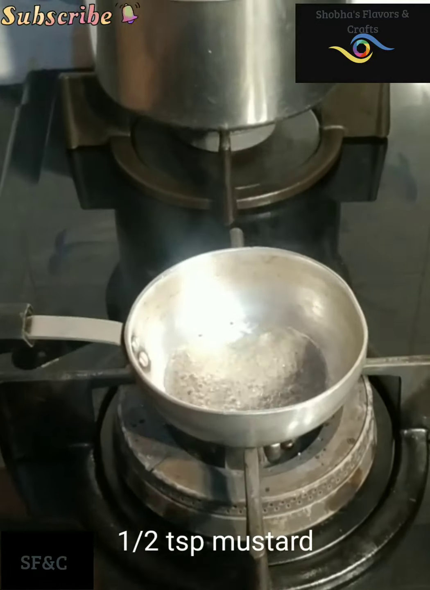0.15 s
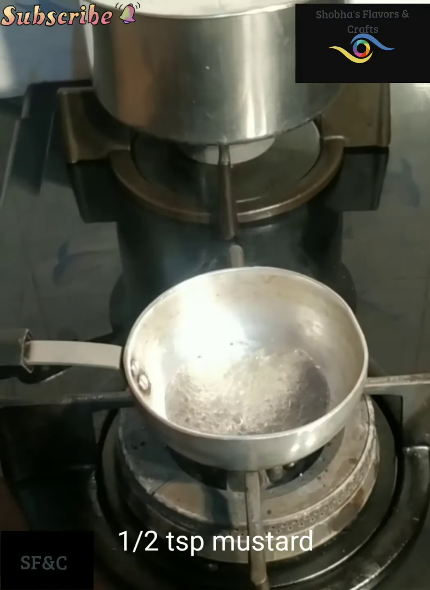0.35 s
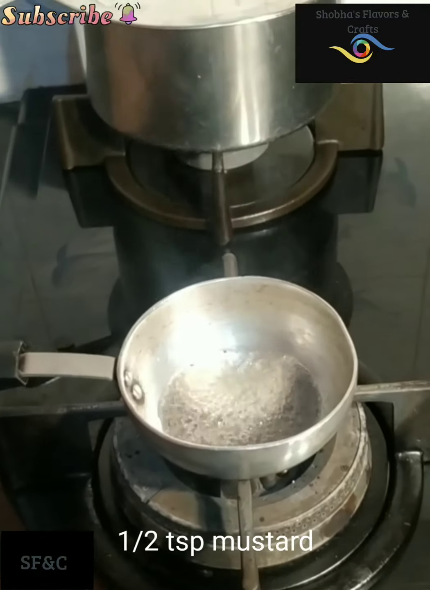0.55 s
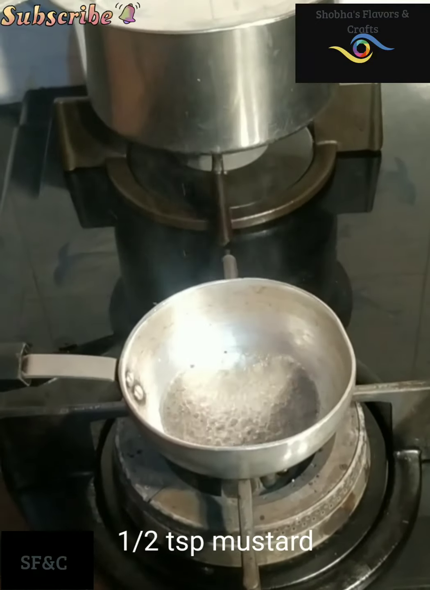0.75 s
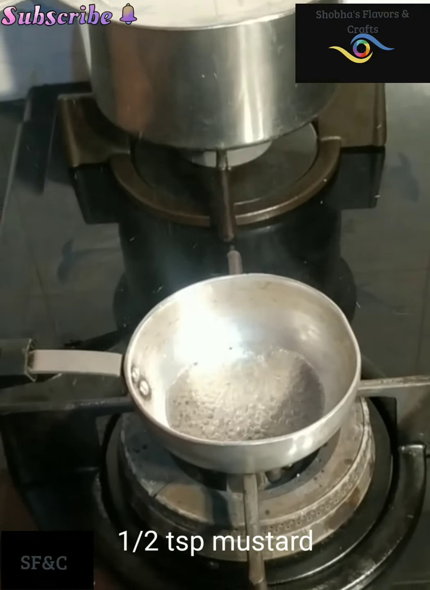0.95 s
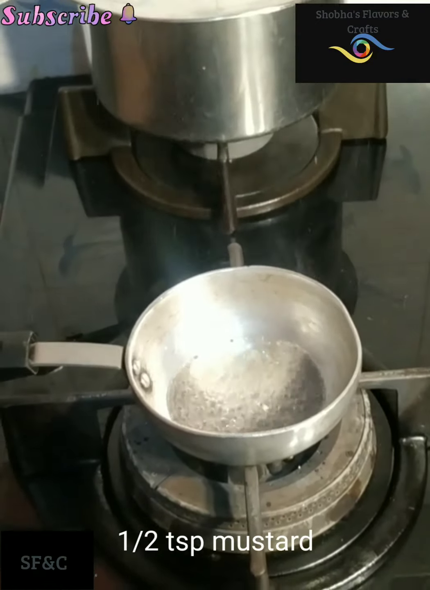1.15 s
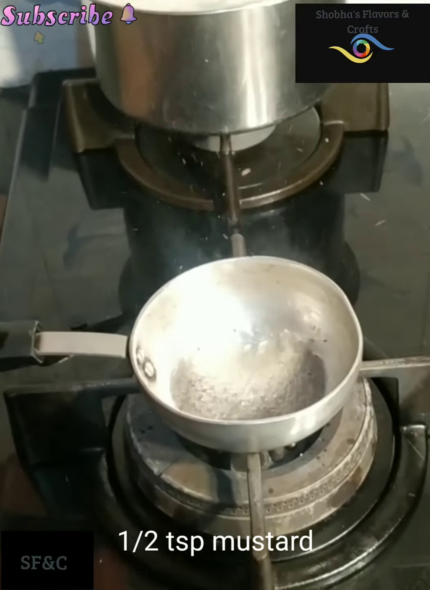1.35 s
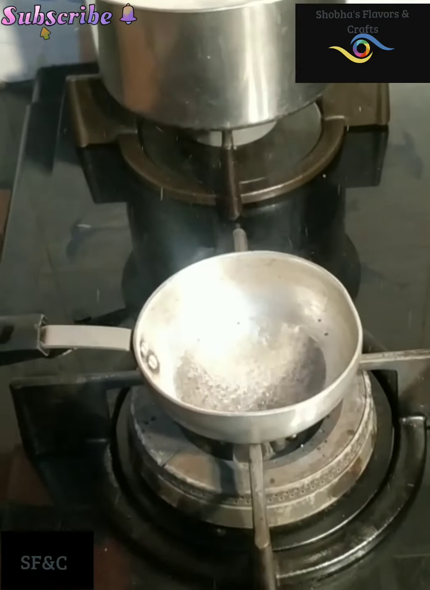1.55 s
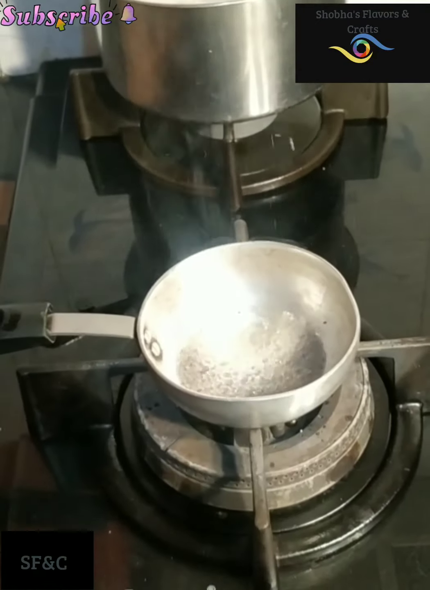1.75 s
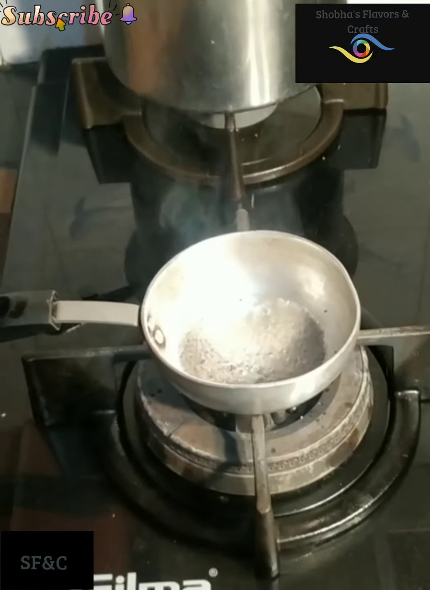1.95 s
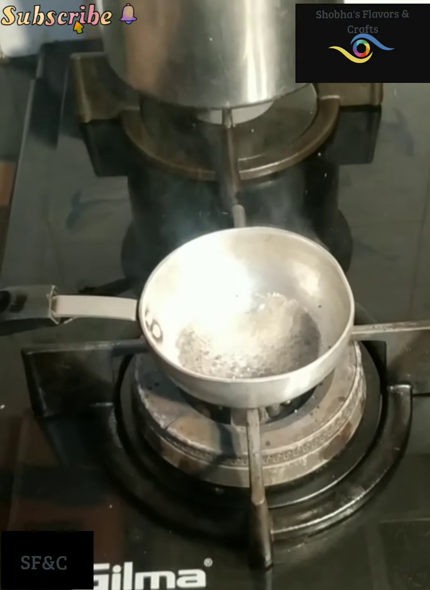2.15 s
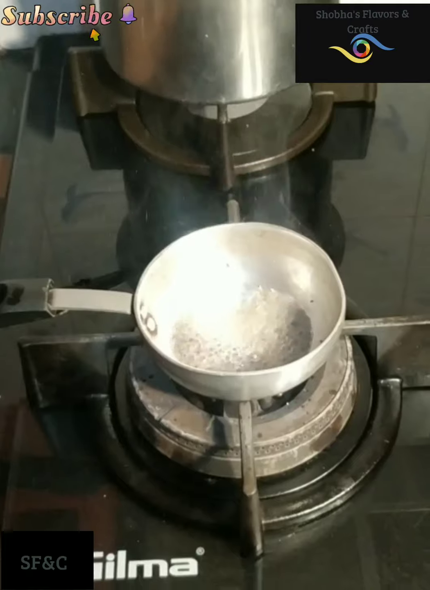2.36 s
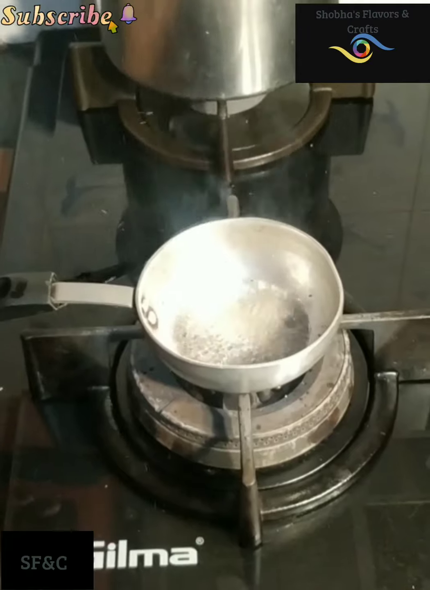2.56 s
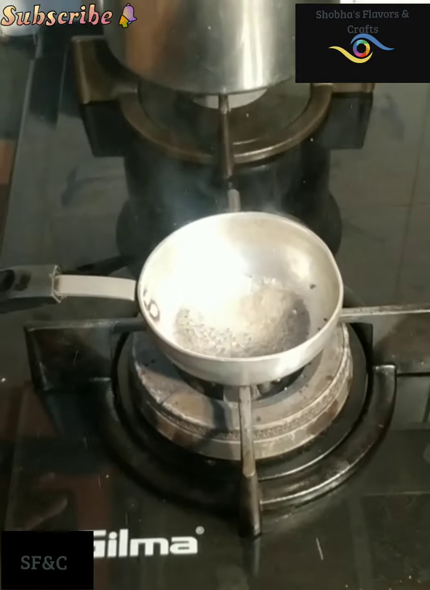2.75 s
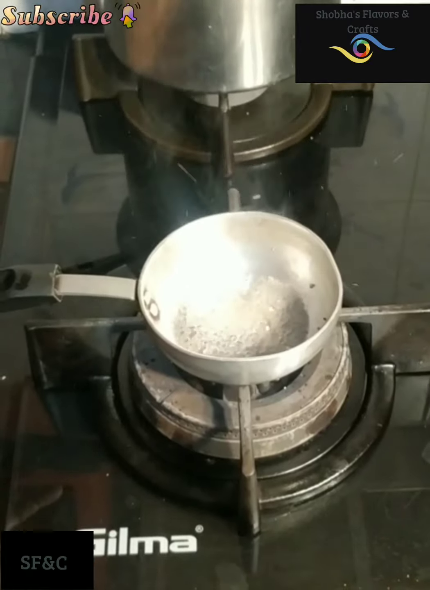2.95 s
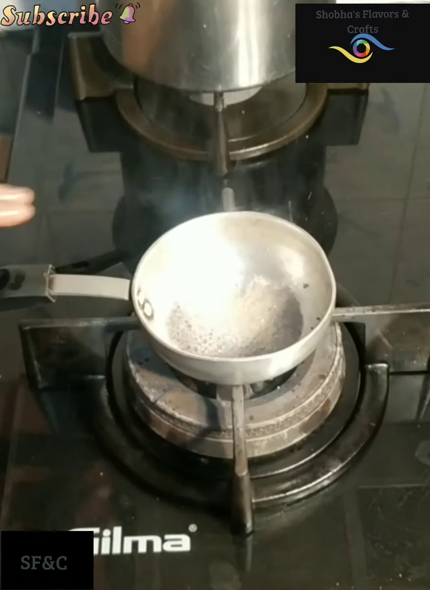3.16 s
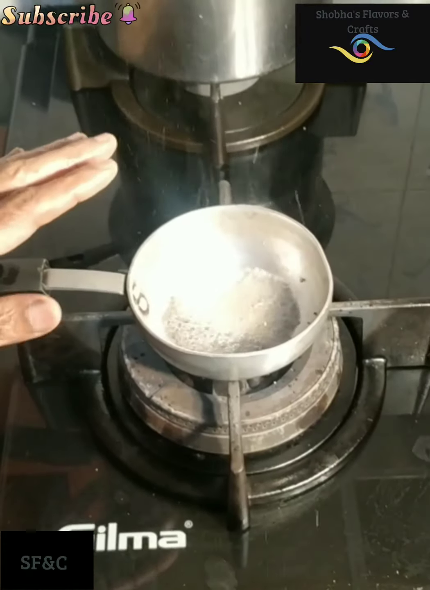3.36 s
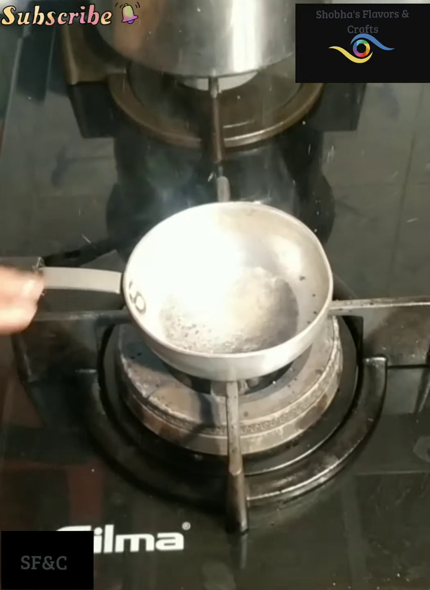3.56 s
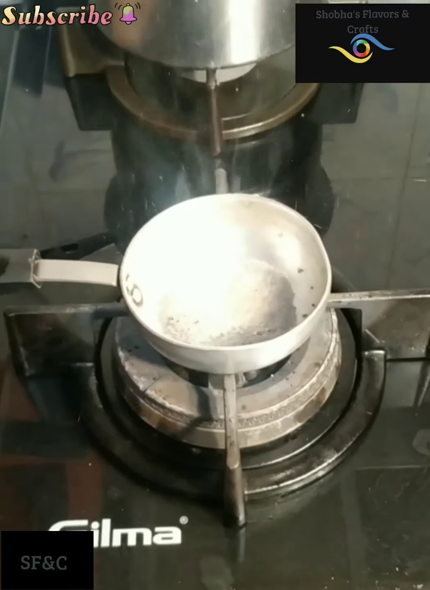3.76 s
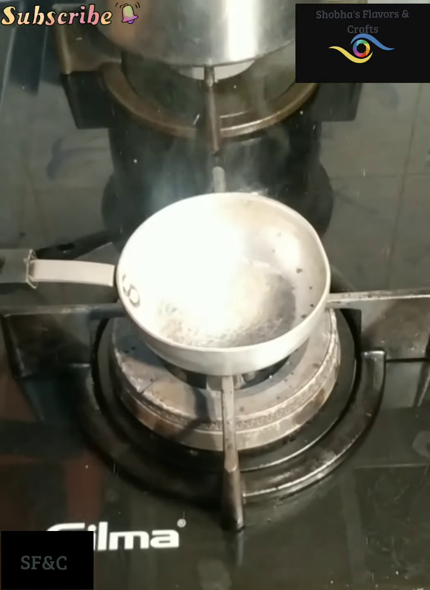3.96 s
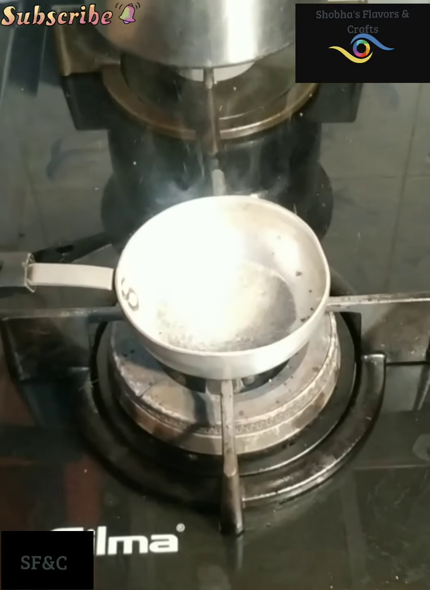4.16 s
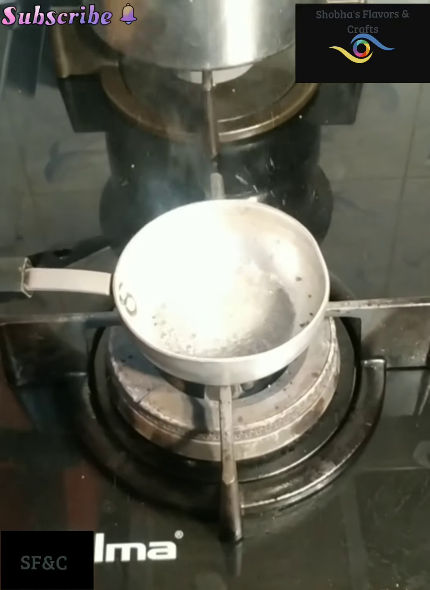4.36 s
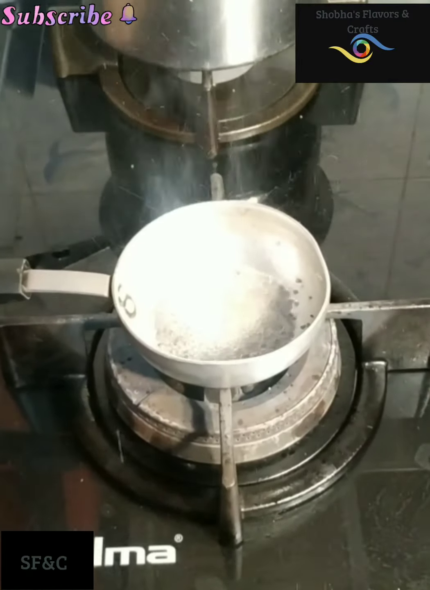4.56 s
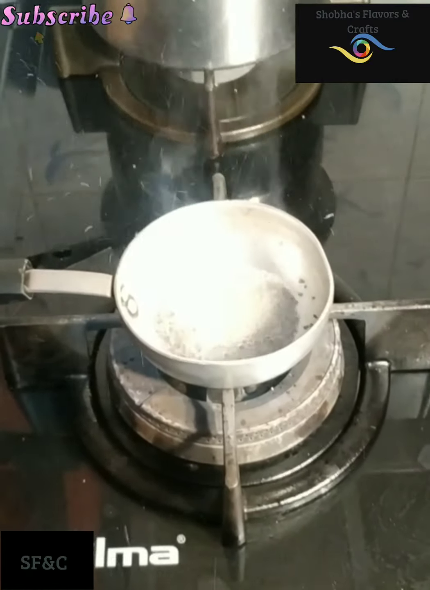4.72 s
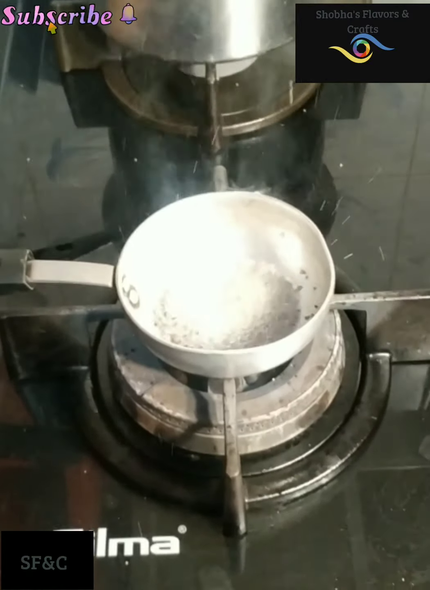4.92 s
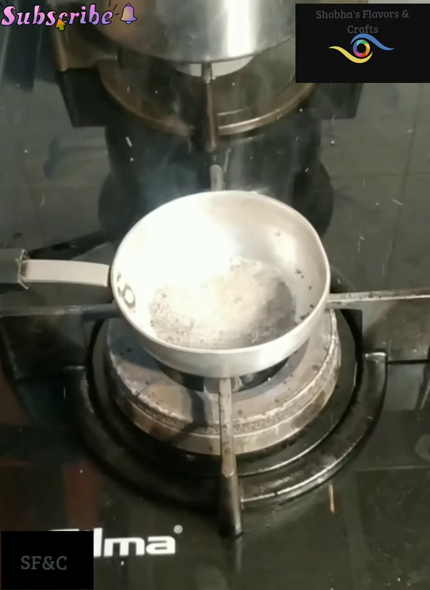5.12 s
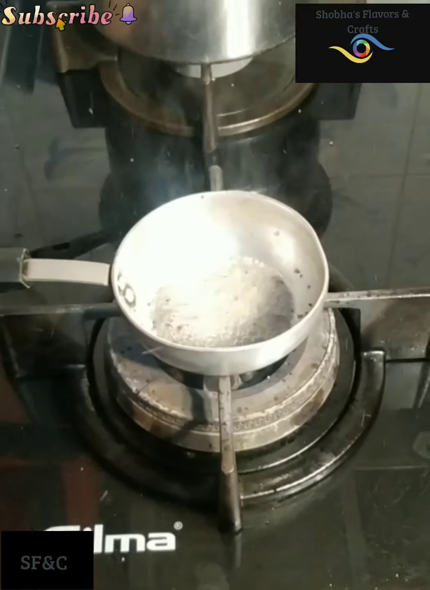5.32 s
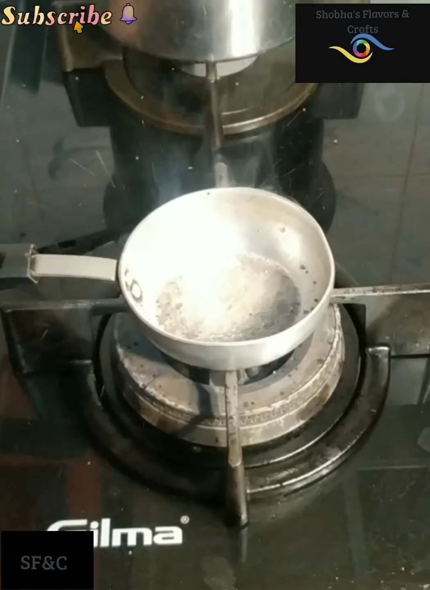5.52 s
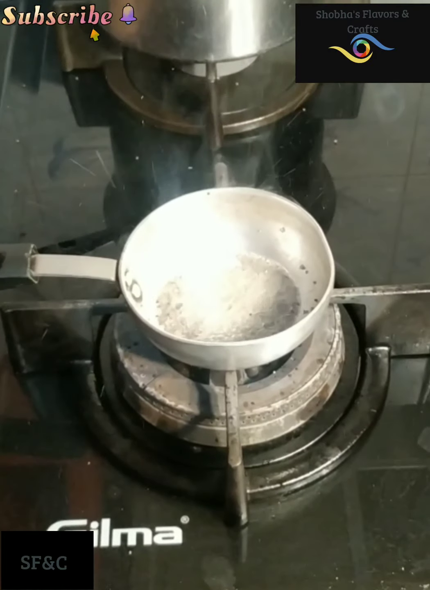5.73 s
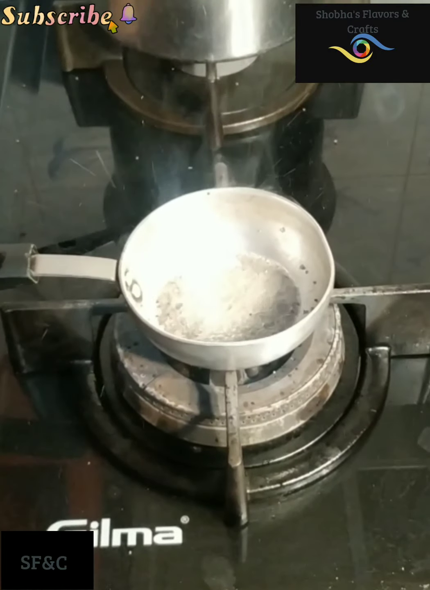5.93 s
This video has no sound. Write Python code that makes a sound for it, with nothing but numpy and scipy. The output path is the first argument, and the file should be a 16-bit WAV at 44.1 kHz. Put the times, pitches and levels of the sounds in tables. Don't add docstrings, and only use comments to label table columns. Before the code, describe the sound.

A small metal pan of hot oil and mustard seeds on a gas burner, heard from about half a metre by a handheld phone in a hard-surfaced kitchen. A soft flame murmur runs throughout, rising slightly. In the first second there are a few dull oily sputters and isolated light pops, with two barely audible wavering far tones around 0.2 and 0.45 s. From 1 to 2 s crisp pops come more often, some mid-pitched and hollow, others tiny and bright. From about 2.2 s loud bursts begin, strong near 2.8 and 4.05 s, with short spatter and brief frying. Fine crackle thickens from 3.3 s; after 4.4 s pops overlap almost continuously. The pan rings faintly, short echoes follow, stray seeds tick dully on the stove top, and very faint low handling bumps occur. It cuts abruptly just before 6 s, still at full density.

```python
import sys
import numpy as np
from scipy import signal
from scipy.fft import rfft, irfft
from scipy.io import wavfile
from scipy.ndimage import uniform_filter1d

SR = 44100
rng = np.random.default_rng(int(sys.argv[2]) if len(sys.argv) > 2 else 0)


def log_audio(samples):
    frames = np.atleast_2d(samples).T
    limited = np.clip(frames, -1, 1)
    pcm = np.round(limited * 32767).astype(np.int16)
    wavfile.write(sys.argv[1], SR, pcm)


def voltage_ratio(decibels):
    exponent = np.asarray(decibels, float) / 20
    return 10 ** exponent


N = 264051


def band(x, hz, width):
    return signal.lfilter(*signal.iirpeak(min(hz, .45 * SR), hz / width, fs=SR), x)


def treble(x, edge=signal.butter(2, 8000, "high", fs=SR)):
    return signal.lfilter(*edge, x)


def peak(x):
    return x / np.abs(x).max()


def coloured(spectrum):
    hz, db = np.transpose(spectrum)
    gain = voltage_ratio(np.interp(np.log(np.fft.rfftfreq(N, 1 / SR) + 1), np.log(hz), db))
    x = irfft(rfft(rng.standard_normal(N)) * gain, N)
    return x / x.std()


def walk(rate):
    k = int(SR / rate)
    return uniform_filter1d(np.repeat(rng.standard_normal(N // k + 1), k), k)[:N]


# f/Hz, level/dB (per Hz)
FLAME_COLOUR = [(30, -21), (140, -18), (200, -5), (290, -1), (420, -5.5), (700, -6), (1400, -6.5),
                (3800, -24), (9000, -12), (16000, -41)]
# f/Hz, width/Hz, level/dB
ROOM_HUM = [(516, 95, -60), (835, 24, -59)]


def flame():
    hum = 0
    for hz, width, db in ROOM_HUM:
        swell = voltage_ratio(db + 21.0 + 2.1 * walk(2.4))
        hum = hum + swell * band(band(rng.standard_normal(N), hz, width), hz, width)
    roar = coloured(FLAME_COLOUR) * voltage_ratio(-54.5 + 2.1 * walk(12) + 0.58 * walk(2.85))
    rise_db = 6 * np.arange(N) / N
    return (hum + roar) * voltage_ratio(rise_db)


# f/Hz, width/Hz, level/dB
BOWL_WAVES = [(1580, 1100, -1.5), (2950, 650, 5), (4670, 720, 1), (6400, 345, 2), (7800, 1350, -7.5),
              (9550, 2600, -13.5)]


def bowl(x, place):
    out = 0
    for k, (hz, width, db) in enumerate(BOWL_WAVES):
        shifted_hz = hz * (1 + 0.042 * np.tanh(place[-1 - k]))
        gain = voltage_ratio(db + 7.3 * np.tanh(place[k]))
        out = out + (-1) ** k * gain * band(x, shifted_hz, width)
    return out


# t/s, level/dB, direct treble level/dB
CRACKLE_COURSE = [
    (0, -57.5, -19),
    (1.6, -48, -2),
    (3.3, -39, -3),
    (3.52, -40, 0),
    (3.8, -35.5, -2),
    (4.6, -34, -7),
    (5.3, -33, -18),
    (5.99, -33, -11),
]


def crackle(per_s, spread_db, count):
    s, *columns = np.transpose(CRACKLE_COURSE)
    db, treble_db = (np.interp(np.arange(N) / SR, s, c) for c in columns)
    out = 0
    for place in 6.6 * rng.standard_normal((count, 2 * len(BOWL_WAVES))):
        chance = rng.random((N, 2))
        size_db = spread_db * np.minimum(-np.log(1 - chance[:, 1]), 3.1)
        size = voltage_ratio(size_db + 3.5 * np.tanh(walk(16)))
        pops = (chance[:, 0] < per_s / SR) * size * rng.choice([-1., 1.], N)
        out = out + bowl(pops, place) + voltage_ratio(treble_db) * treble(pops)
    loudness = uniform_filter1d(out ** 2, SR) ** .5
    return out / loudness * voltage_ratio(db)


def burst(hz, crack_db, spatter_db, chance):
    blow, snap, drops, mist = chance
    t = np.arange(len(blow)) / SR
    collapse = np.exp(-(t * np.sqrt(hz * 3000) / 3.9) ** 1.8)
    ring = (1 - np.exp(-t / .0001)) * collapse * np.sin(2 * np.pi * hz * t + blow[-1])
    ring = peak(band(band(ring, hz, 1.8 * hz), hz, 2.2 * hz))
    knock = bowl(blow * np.exp(-t / 0.00006), mist)
    knock = band(band(knock, np.sqrt(hz * 5500), 7600), np.sqrt(hz * 6000), 11700)
    knock = signal.lfilter(*signal.butter(3, 0.76 * min(hz, 3000), "high", fs=SR), knock)
    fall_s = 0.0067 * voltage_ratio(0.079 * (spatter_db + 1.0)) / np.sqrt(hz / 3000)
    uneven = voltage_ratio(4.03 * uniform_filter1d(blow, size=30) * np.sqrt(30))
    landed = drops * (1 - np.exp(-t / 0.0048)) * np.exp(-t / fall_s) * uneven
    spatter = voltage_ratio(9.5) * band(landed, hz, 1.44 * hz) + voltage_ratio(-26.0) * bowl(landed, mist)
    spike = peak(band(np.exp(-t * SR), 8000, 12400))
    snap_hz = 11000 * voltage_ratio(2 * np.tanh(snap[-1]))
    rough = peak(band(treble(snap * np.exp(-t / 0.00036)), snap_hz, 14600))
    hiss = voltage_ratio(-27.5) * treble(mist) * np.exp(-t / 0.04)
    crack = peak(0.9 * spike + rough) + hiss
    body = peak(ring + voltage_ratio(1.0) * peak(knock))
    return body + voltage_ratio(crack_db + 6.0) * crack + voltage_ratio(spatter_db + 2.5) * spatter


# t/s, level/dB, ring f/Hz, crack level/dB, spatter level/dB
ODD_BURSTS = [(0.0009, -33, 3740, -36, -11), (0.059, -28, 2680, -26, -17), (0.1008, -21.5, 1730, -12, -18),
              (0.1498, -24, 1300, -19, -13), (2.598, -17.5, 6140, -12, -8), (2.6849, -20.5, 1510, 1, -6),
              (2.9542, -18, 3100, -4, -5.5), (4.8583, -14.5, 1950, 0, -16), (5.4205, -11.5, 6400, -17, -9),
              (5.4536, -14, 3160, 1, -9), (5.747, -15, 3320, 7, -6.5), (5.788, -13.5, 5300, -7, -17),
              (5.8344, -11.5, 3220, -10, -9), (5.937, -13, 2530, -18, -36), (5.9427, -11, 1820, -2, -13)]
# t/s, level/dB, ring f/Hz, crack level/dB, spatter level/dB
BIG_BURSTS = [(0.4562, -18.5, 3040, -21, -24), (0.9637, -14.2, 2540, -15, -15.5),
              (1.1049, -23, 3100, 7, -11.5), (1.3791, -9, 2870, -23, -24), (1.4411, -11, 3120, -1, -14.5),
              (1.6964, -11.5, 3000, -13, -13.5), (1.8683, -12.5, 3080, -24, -14),
              (1.9502, -15, 2950, -14, -33), (1.9807, -9, 2920, -7, -38), (2.2337, -2.5, 2710, -21, -37),
              (2.4481, -12, 2950, -3, -15), (2.6164, -5, 3040, -22, -22.5), (2.8266, 0.5, 2930, -22, -35),
              (2.863, -4.5, 3020, -9.5, -35), (2.8775, -3, 2680, -20, -22), (3.0695, -5, 3100, -11, -41),
              (3.1666, -8, 3200, -24, -18), (3.4381, -11, 3100, -1, -13), (3.4507, -8, 3070, -18, -18),
              (3.6318, -9.5, 3130, -1.5, -16.5), (3.9132, -8, 3100, -8, -17),
              (3.9269, -4.5, 3040, -14, -15.5), (4.0524, 1, 2760, -30, -24), (4.3905, -6, 2800, -15, -35),
              (4.5127, -3, 2780, -11, -36), (4.582, -3, 2720, -26, -26), (4.6359, 0, 2950, -12, -21.5),
              (4.9273, -2.5, 2800, -17, -37), (5.0883, -2.5, 2900, -22, -19.5),
              (5.6399, -1.5, 3000, -16, -17)]
# t/s, level/dB, ring f/Hz, crack level/dB, spatter level/dB
SMALL_BURSTS = [(0.315, -11.5, 6030, -2, -15), (0.5947, -24.5, 5600, -8, -12),
                (0.6532, -26.5, 5930, -1, -17), (0.7222, -9, 6070, -32, -22),
                (0.7533, -18.5, 5700, -7, -14.5), (0.853, -20, 5930, -21, -16),
                (0.8692, -12, 6100, -3, -37), (1.197, -13.5, 6400, -16, -13.5),
                (1.2329, -12.5, 6430, -5, -10.5), (1.3002, -16, 5870, -13, -10),
                (1.328, -6.5, 6200, -5, -23), (1.4086, -9, 6100, -24, -17), (1.4814, -16, 6300, -2.5, -11),
                (1.5724, -11, 5900, -29, -34), (1.707, -21, 6400, -4, -10), (2.1166, -14.5, 6400, -3, -30),
                (2.1606, -10.5, 6400, -7, -29), (2.2017, -9.5, 6180, -17, -19),
                (2.4675, -13.5, 6540, -3, -15), (2.636, -3.5, 6270, -18, -18.5),
                (2.888, -9.5, 6760, -8, -16), (2.9576, -9.5, 5430, -11, -28),
                (3.2281, -4, 7300, -25, -14.5), (3.6475, -14, 6260, -0.5, -12),
                (3.8369, -6, 6500, -19, -16), (3.871, -5.0, 6400, -20, -18), (4.0, -10.5, 6350, -7, -34),
                (4.169, -3, 6300, -24, -17.5), (4.4757, -3, 5760, -24, -23),
                (4.667, -6.5, 5740, -24, -14.5), (5.08, -4, 6330, -18, -22)]
# t/s, level/dB, crack level/dB, spatter level/dB
MIDDLE_BURSTS = [(0.6301, -29.5, -11, -7), (1.1835, -22.5, 1, -5), (1.9704, -5, -19, -18),
                 (2.1847, -13, -7, -12.5), (2.3532, -22, 6, -20), (2.4401, -11.5, -22, -12),
                 (2.4947, -19.5, -16, -7.5), (2.5185, -18, -6, -40), (2.6101, -7, -9, -16),
                 (3.0483, -8.5, -15, -18), (3.1222, -5, -11, -16.5), (3.2647, -9, -22, -15),
                 (3.4588, -18, -4, -40), (3.478, -23, -6, -3), (3.7047, -11.5, -21, -15),
                 (3.7115, -19, -18, -18), (3.9332, -6, -18, -23), (4.6868, -12.5, 0, -8),
                 (4.7667, -16, -16, -23), (4.7977, -16, -2, -30), (4.8106, -11.5, 2.5, -40),
                 (5.0465, -13.5, -13, -3), (5.1011, -10.5, -15, -12), (5.1062, -21, -12, -29),
                 (5.4403, -15.5, -9, -10), (5.4817, -15.5, -17, -5.5), (5.5144, -13, -6, -25),
                 (5.5269, -26, -12, -40), (5.7726, -14.5, 3.5, -40), (5.8382, -21, -20, -6)]
# t/s, level/dB, crack level/dB, spatter level/dB
TINY_BURSTS = [(0.3754, -23, -7, -13), (0.472, -31, -21, -40), (0.8995, -17, -8, -9),
               (1.9239, -17, -2.5, -16), (2.0816, -13.5, -4.5, -13.5), (4.2138, -12, -7, -11),
               (4.308, -13, -27, -17), (4.435, -12, -3, -40), (4.5934, -11, -13, -14),
               (4.5976, -14.5, -12, -4), (5.2109, -10, -7, -13), (5.6959, -7.5, -12, -13),
               (5.8177, -9, -13, -15), (5.873, -20, -8, -2), (5.9433, -12, -11, -40)]
# t/s, level/dB, ring f/Hz
LESSER_SEED_POPS = [(0.1389, -28.5, 3150), (0.5113, -26, 2730), (1.0948, -23, 2900), (1.3126, -13.5, 2840),
                    (1.5606, -16, 2900), (1.6432, -21, 3100), (1.7675, -23, 2860), (1.8184, -23, 3014),
                    (2.005, -19, 2400), (2.1735, -14.5, 2900), (2.2497, -13, 3080), (2.6846, -18.5, 2670),
                    (2.724, -13, 2650), (2.7655, -12.5, 2770), (2.8035, -18, 4800), (3.2382, -11, 3230),
                    (3.2754, -10, 3040), (3.3923, -11, 2900), (3.5783, -12.5, 3220), (3.7506, -13, 2440),
                    (4.2749, -7.5, 3210), (4.3521, -17, 3330), (4.4811, -8.5, 2960), (4.5232, -7.5, 2950),
                    (4.7507, -5.5, 2920), (4.8305, -8, 3080), (4.9543, -6.5, 2800), (4.9982, -9, 3000),
                    (5.2268, -9.5, 3000), (5.5192, -4, 2780),
                    (0.4802, -31, 3122), (0.811, -25.5, 3337), (1.7923, -24.5, 2900), (2.1242, -21, 2960),
                   (2.2578, -15, 3130), (2.28, -15.5, 3480), (2.543, -15.5, 3100), (2.7071, -18, 3100),
                   (2.798, -16, 2980), (3.0885, -17, 2500), (3.1748, -16, 3380), (3.418, -16, 3000),
                   (3.7195, -13, 3140), (3.81, -13, 2270), (4.1779, -12, 3509), (4.394, -11.5, 3120),
                   (4.4284, -11, 2960), (4.715, -10, 2950), (4.7339, -9.5, 2900), (4.887, -12, 2860),
                   (5.2616, -13, 2860), (5.283, -16, 3120), (5.3, -10.5, 2960), (5.317, -19, 2840),
                   (5.538, -10, 2500), (5.5707, -5.5, 2920), (5.584, -8.5, 2970), (5.686, -10, 2340),
                   (5.702, -6.5, 2970), (5.71, -10, 3100),
                    (0.341, -30, 5900), (0.4226, -30, 5470), (0.9947, -23.5, 5700), (1.2718, -18.5, 6400),
                  (1.469, -15, 6400), (1.829, -17, 6600), (2.2149, -12.5, 6350), (2.69, -15, 6760),
                  (2.7394, -14.5, 6400), (2.7453, -22, 6550), (2.9856, -15, 6200), (3.18, -12, 6660),
                  (3.308, -12.5, 6560), (3.3465, -10.5, 6740), (3.3769, -10.5, 6440), (3.553, -17, 6640),
                  (3.778, -11.5, 6700), (4.089, -6.5, 6400), (4.1757, -14, 6000), (4.233, -13.3, 5555),
                  (4.4966, -13, 9000), (4.899, -11.5, 6960), (5.052, -10, 6370), (5.1414, -10.5, 6340),
                  (5.3647, -8, 6600), (5.5499, -5.5, 5700), (5.623, -6, 5670), (5.882, -14, 5470),
                  (5.917, -11.5, 5400), (5.9588, -4.5, 6400),
                    (0.8692, -18, 3260), (0.491, -32, 2950), (0.6136, -38, 4130), (1.4089, -16, 3000),
                  (1.056, -29, 2860), (1.344, -28, 2840), (2.1436, -29, 3000), (1.7644, -29, 3170),
                  (2.4192, -24, 2780), (2.5085, -11.5, 2920), (2.587, -18.5, 3120), (2.8025, -22, 3100),
                  (2.9174, -25, 1520), (3.137, -22, 3100), (3.3812, -22, 2530), (3.2139, -14, 3210),
                  (3.571, -24, 1590), (4.0, -16.5, 2960), (3.663, -28, 3060), (3.7261, -26, 3120),
                  (3.7954, -17, 2740), (3.82, -21, 2410), (3.8669, -12.5, 2270), (3.9452, -15, 2630),
                  (4.0245, -17, 3350), (4.1408, -14.5, 3380), (4.264, -22, 3120), (4.458, -16, 3300),
                  (4.496, -11.4, 2970), (4.4988, -15, 3430), (4.6198, -8.5, 3060), (4.779, -14, 3420),
                  (4.783, -16, 3200), (4.7897, -13.5, 2980), (4.873, -20, 3000), (4.9231, -10.2, 2920),
                  (4.969, -15, 3320), (5.01, -19, 3250), (5.1834, -9, 3160), (5.2668, -12.5, 3150),
                  (5.327, -15, 3050), (5.3847, -22, 2970), (5.4764, -11.5, 2760), (5.5776, -11, 2800),
                  (5.6759, -11.5, 2800), (5.7603, -16, 3100), (5.785, -14, 3190), (5.8064, -19, 4000),
                  (5.948, -15, 3500),
                    (0.8495, -22, 6400), (1.7716, -20.5, 4780), (1.781, -26, 6400), (1.8184, -22, 4800),
                   (1.8225, -24, 6650), (1.8906, -25.5, 6400), (4.3746, -20, 9400), (2.33, -21.5, 6520),
                   (2.34, -21, 4750), (2.345, -25, 4740), (2.3553, -15, 4700), (2.397, -23.5, 6500),
                   (2.4911, -12.5, 4660), (2.554, -18, 6350), (2.633, -14, 6460), (2.736, -18, 4700),
                   (3.012, -18.5, 5070), (4.226, -17, 5500), (3.0398, -19, 4830), (3.205, -20, 4670),
                   (3.2104, -24, 6500), (3.2797, -13, 4900), (3.324, -21.2, 4590), (3.4087, -18, 6610),
                   (3.7627, -19, 6720), (3.8484, -26, 6500), (3.913, -9, 6320), (4.069, -16, 8200),
                   (4.0845, -16, 6800), (4.113, -14.5, 6600), (4.1983, -10.5, 6700), (4.3133, -10.5, 7900),
                   (4.3521, -9, 6400), (4.449, -20, 6220), (4.5316, -8, 6500), (4.6163, -14, 9300),
                   (4.7417, -17, 6550), (4.8511, -8, 6700), (4.9393, -16, 6600), (5.074, -14, 4930),
                   (5.0985, -12.5, 9200), (5.1311, -17.2, 6550), (5.1379, -8.5, 4160), (5.1686, -17, 7950),
                   (5.368, -24, 9560), (5.411, -15, 6700), (5.599, -10, 7400), (5.631, -19, 4930),
                   (5.8673, -11, 7150), (5.885, -15, 6550),
                    (0.4566, -18, 6100), (0.5925, -28, 3000), (0.7234, -15, 5600), (3.5795, -20, 4400),
             (4.0515, -10, 6300), (4.1694, -13, 3000), (4.302, -18, 3000), (4.594, -13, 3000),
             (4.9084, -13, 3900), (5.0414, -14, 3000), (5.2107, -13, 3000), (5.473, -13, 3000),
             (5.5608, -10, 3000), (5.6135, -17, 5000)]


def seeds():
    length = SR // 16
    out = np.zeros(N + length)
    events = []
    for rows, hz in [(MIDDLE_BURSTS, 4500), (TINY_BURSTS, 9460)]:
        events += [(s, db, hz, crack_db, spatter_db, 0.041) for s, db, crack_db, spatter_db in rows]
    events += [(*row, 0) for row in [*BIG_BURSTS, *SMALL_BURSTS, *ODD_BURSTS]]
    pops = LESSER_SEED_POPS
    events += [(s, db, hz, -14.5 + hz / 702, -15, 0) for s, db, hz in pops]
    for s, db, hz, crack_db, spatter_db, scatter in events:
        chance = rng.standard_normal((4, length))
        ring_hz = hz * (1 + scatter * np.tanh(chance[0, -2]))
        at = int(s * SR) - 7
        out[at:at + length] += voltage_ratio(db) * burst(ring_hz, crack_db, spatter_db, chance)
    return out[:N]


def thump(pan):
    return voltage_ratio(-14) * band(band(np.abs(treble(pan)), 720, 1450), 720, 1450)


# t/s, level/dB, f/Hz, time to fall 60 dB/s
FRYING_SPOTS = [(0.0, -36.5, 3140, 0.2), (0.102, -39, 1760, 0.12), (0.152, -36.5, 1350, 0.14),
                (0.457, -47, 3200, .15), (0.722, -44, 3460, 0.07), (0.965, -36, 2770, 0.16),
                (1.382, -30.5, 3120, 0.18), (1.697, -26.5, 2930, 0.1), (2.354, -32.5, 1780, 0.097),
                (3.849, -37, 1850, 0.17), (5.69, -40.5, 540, 0.19), (5.939, -24, 1800, 0.1)]


def frying():
    t = np.arange(SR // 4) / SR
    out = np.zeros(N + len(t))
    fizzes = rng.standard_normal((len(FRYING_SPOTS), len(t)))
    for (s, db, hz, t60), fizz in zip(FRYING_SPOTS, fizzes):
        tone = band(band(fizz, hz, 0.41 * hz), hz, 0.67 * hz)
        shape = voltage_ratio(db - 60 * t / t60) * (1 - np.exp(-t / 0.0019))
        at = int(s * SR)
        out[at:at + len(t)] += shape * tone / tone.std()
    return out[:N]


# f/Hz, level/dB, time to fall 60 dB/s
STEEL_NOTES = [(829, 0, .3), (1447, 1, .3), (1680, -5, .25), (1845, -3, .15), (1943, -4, .2),
               (2082, -5, .2), (2245, -8, .15), (3342, -9, .1)]


def steel(x):
    return sum(voltage_ratio(db) * band(x, hz, np.log(1000) / np.pi / t60) for hz, db, t60 in STEEL_NOTES)


# f/Hz, time to fall 60 dB/s
KITCHEN_ECHO = [(500, 0.38), (2000, 0.31), (6000, 0.014), (14000, 0.095)]


def kitchen(x):
    t = np.arange(SR // 2) / SR
    fall = np.log(1000) * t
    echo = 0
    for hz, t60 in KITCHEN_ECHO:
        echo = echo + band(rng.standard_normal(len(t)), hz, 1.56 * hz) * np.exp(-fall / t60)
    echo = echo * (1 - np.exp(-t / 0.002))
    return signal.fftconvolve(x, echo / np.sqrt(np.sum(echo ** 2)))[:N]


# t/s, peak level/dB
SEED_DROPS = [(0.099, -32), (0.313, -37), (0.722, -34), (0.752, -36), (0.87, -35.5), (1.199, -35),
              (1.299, -30), (1.695, -30.5), (2.259, -30), (2.352, -31), (2.446, -30), (3.038, -30.5),
              (4.43, -32), (5.434, -28)]


def stove_top():
    t = np.arange(SR // 10) / SR
    out = np.zeros(N + len(t))
    taps = rng.standard_normal((len(SEED_DROPS), len(t)))
    for (s, db), tap in zip(SEED_DROPS, taps):
        tick = band(band(tap * np.exp(-t / 0.0072), 1020, 1500), 490, 1300)
        at = int(s * SR)
        out[at:at + len(t)] += voltage_ratio(db) * peak(tick)
    return out[:N]


# t/s, length/s, f/Hz, level/dB
WINDOW_TONES = [
    (0.203, 0.25, 680, -58.5),
    (0.44, 0.21, 534, -57.5),
]


def far_tones():
    t = np.arange(N) / SR
    waver = walk(30)
    out = 0
    for s, length, hz, db in WINDOW_TONES:
        swell = np.sin(np.pi * np.clip((t - s) / length, 0, 1)) ** .5
        tone = np.sin(2 * np.pi * hz * (t - s) * (1 - 0.039 * (t - s)))
        out = out + voltage_ratio(db + 2.8 * waver) * swell * tone
    return out


# t/s, peak level/dB
PHONE_BUMPS = [
    (0.861, -63),
    (1.847, -57),
    (3.147, -62),
    (4.567, -59),
    (4.897, -67),
    (5.175, -61),
    (5.278, -65),
]


def bumps():
    push = np.zeros(N)
    s, db = np.transpose(PHONE_BUMPS)
    push[(s * SR).astype(int)] = voltage_ratio(db)
    t = np.arange(SR // 8) / SR
    return signal.fftconvolve(push, voltage_ratio(1.0) * np.sin(2 * np.pi * 45 * t) * np.exp(-t / .016))[:N]


def scene():
    pan = seeds() + crackle(per_s=260., spread_db=4.5, count=7)
    no_bass = signal.butter(3, 1000, "high", fs=SR, output="sos")
    pan = thump(pan) + signal.sosfilt(no_bass, 0.97 * np.tanh(pan / 1.13))
    pan = pan + stove_top() + frying()
    echo = voltage_ratio(-9.5) * kitchen(pan - 0.71 * band(pan, 2680, 710))
    mono = pan + steel(pan) + echo + flame() + bumps() + far_tones()
    return np.array([mono, mono])


# start t/s, end t/s
BUSY_MOMENTS = [(2.56, 2.65), (3.245, 3.3), (3.44, 3.51), (3.91, 3.97), (4.08, 4.13), (4.41, 4.55),
                (4.65, 4.8), (4.93, 5.3), (5.38, 5.5), (5.52, 5.78), (5.82, 5.94)]


def starve(x, share, fill_db):
    hz, s, z = signal.stft(x, SR, nperseg=1024)
    row, col = (hz / 1050).astype(int), (s / .058).astype(int)
    busy = np.any([(s > start) & (s < end) for start, end in BUSY_MOMENTS], axis=0)
    bright = ((hz > 8300) & (hz < 15800))[:, None]
    chosen = rng.random((row.max() + 1, col.max() + 1)) < share
    patch = chosen[row][:, col] & busy & bright
    power = uniform_filter1d(np.abs(z) ** 2, size=30, axis=1)
    level = np.sqrt(uniform_filter1d(power, size=3, axis=2) / 2)
    noise = rng.standard_normal(z.shape) + 1j * rng.standard_normal(z.shape)
    mixed = np.where(patch, voltage_ratio(fill_db) * level * noise, z)
    return signal.istft(mixed, SR, nperseg=1024)[1][:, :N]


def top_cut(x):
    return signal.sosfilt(signal.butter(12, 16970, fs=SR, output="sos"), x)


def record(dry):
    hz = np.fft.rfftfreq(N, 1 / SR)
    top_db = np.interp(hz, [15750, 15900, 16500, 17000], [0, -20, -22, -50])
    x = irfft(rfft(dry) * voltage_ratio(top_db), N)
    x = starve(x, share=.36, fill_db=3.5)
    x = x * np.clip((5.972 - np.arange(N) / SR) / 0.0019, .02, 1)
    return top_cut(x)


dry = scene()
out = record(dry)
log_audio(out)
```